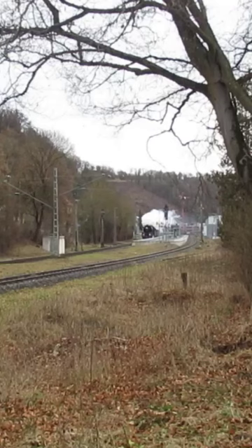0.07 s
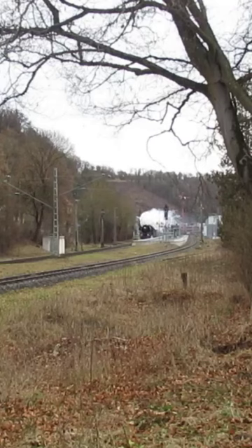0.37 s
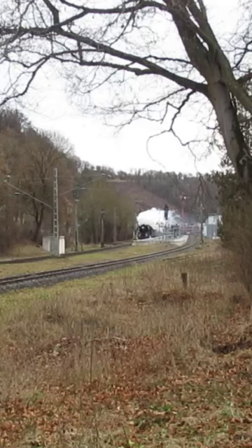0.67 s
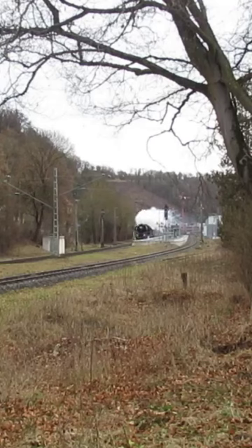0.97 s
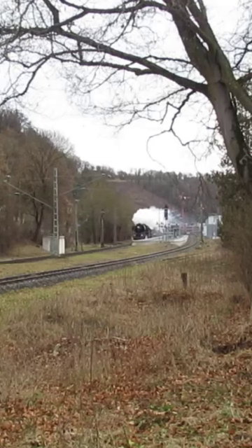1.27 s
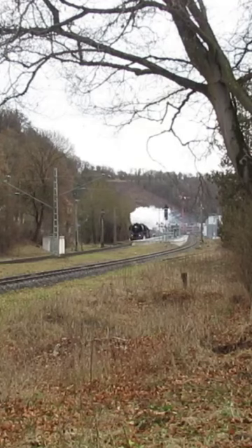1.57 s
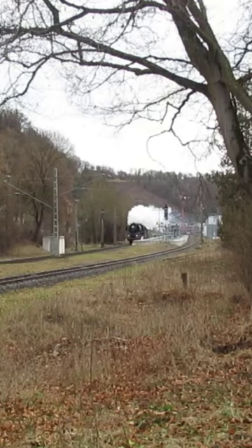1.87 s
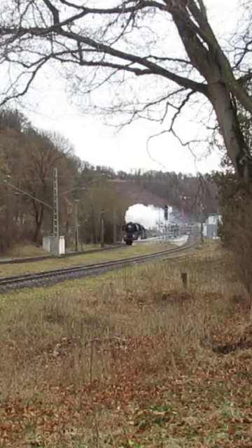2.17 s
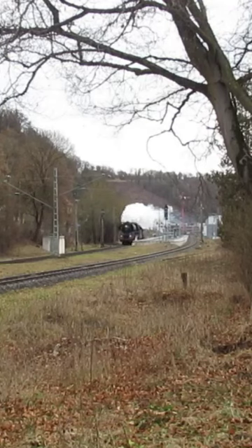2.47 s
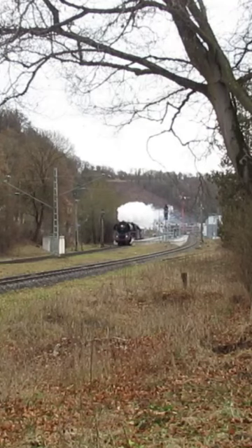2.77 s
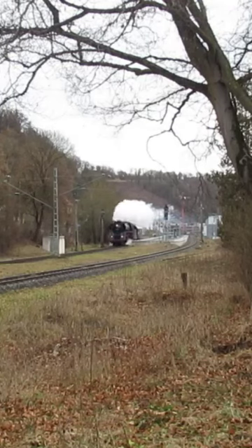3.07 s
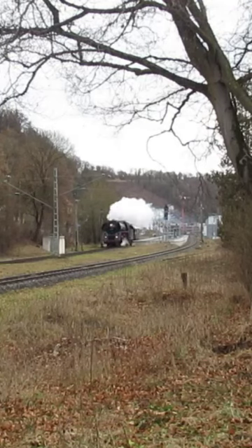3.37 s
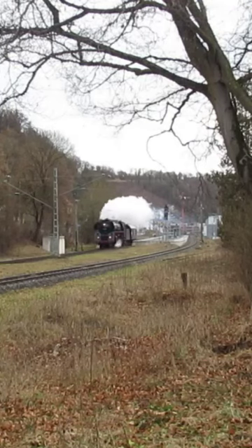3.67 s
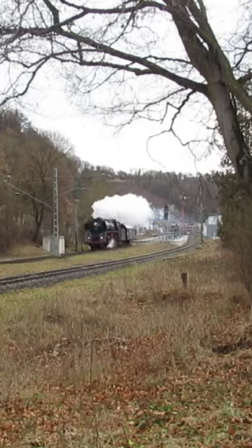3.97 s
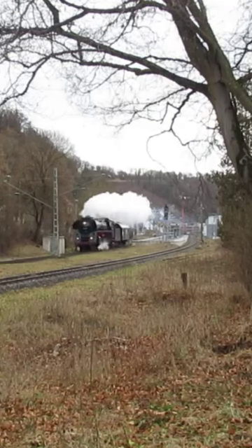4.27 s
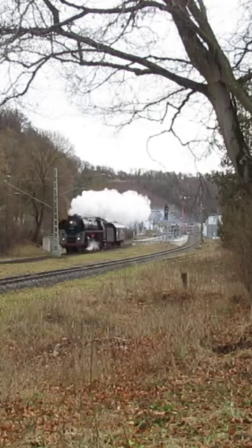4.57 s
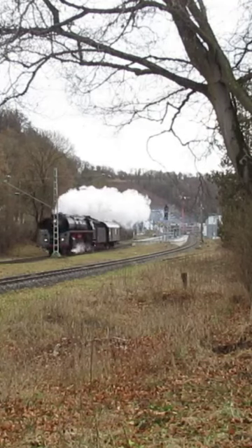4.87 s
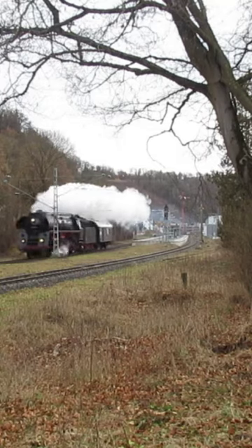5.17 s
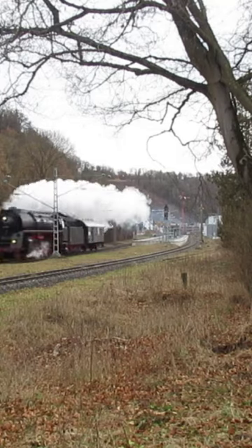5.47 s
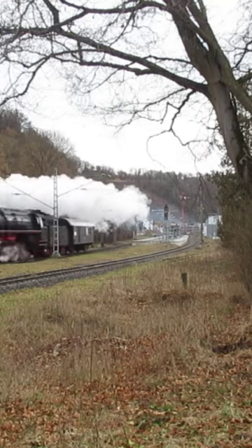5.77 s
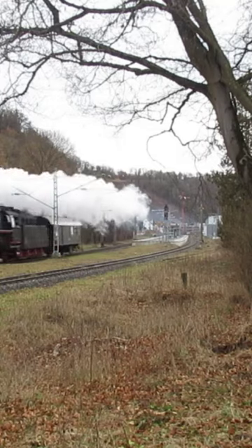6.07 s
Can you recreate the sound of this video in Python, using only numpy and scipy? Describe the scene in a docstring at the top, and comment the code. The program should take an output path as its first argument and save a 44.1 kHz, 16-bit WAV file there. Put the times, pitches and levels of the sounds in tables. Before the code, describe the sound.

A steam locomotive approaches fast, its rumble and wheel roar growing, while a nearby camera shutter clicks in rapid bursts.

```python
"""A steam locomotive runs fast towards a listener in a field beside the line. From the start its
exhaust beats blur into a throbbing rumble under the roar and ring of wheels and the hiss of steam.
Close by, a lens ticks faintly as it focuses; from 2.3 s a camera fires runs of shutter clicks that
gradually slow. From 3 s the wheels clank over rail joints, and the roar grows as the engine nears."""
import sys
import numpy as np
from scipy import signal
from scipy.fft import rfft, irfft, next_fast_len
from scipy.io import wavfile

SR = 44100
rng = np.random.default_rng(int(sys.argv[2]) if len(sys.argv) > 2 else 0)


def wrap_up_sound(samples):
    """Save the sound to the file named by the first command line argument, as 16-bit audio."""
    columns = np.atleast_2d(samples).T
    # keep every value between -1 and 1, then stretch to whole-number steps
    tamed = np.clip(columns, -1, 1)
    steps = np.round(tamed * 32767).astype(np.int16)
    wavfile.write(sys.argv[1], SR, steps)


N = 278271


def from_db(db):
    """Amplitude ratio: tenfold for every 20 dB."""
    return 10 ** (np.asarray(db) / 20)


def rms_one(x):
    """Normalisation to an rms of 1."""
    return x / np.sqrt(np.mean(x ** 2) + 1e-20)


def in_time(rows):
    """Linear interpolation of each column over the times in the first."""
    s, *columns = np.transpose(rows)
    return [np.interp(np.arange(N) / SR, s, c) for c in columns]


def swells(rows, length_s):
    """A Gaussian rise and fall of level for each row, in dB."""
    t = np.arange(N) / SR
    return sum(db * np.exp(-(2 * (t - s) / length_s) ** 2) for s, db in rows)


def drift(rate_hz):
    """Random fluctuation: noise low-passed at rate_hz, with an rms of 1."""
    step, settle = 40, 2000
    pole = np.exp(-2 * np.pi * step * rate_hz / SR)
    white = rng.standard_normal(N // step + settle + 2)
    slow = signal.lfilter([1], [1, -2 * pole, pole * pole], white)[settle:]
    return np.interp(np.arange(N) / step, np.arange(len(slow)), rms_one(slow))


def noise(spectrum):
    """Spectral shaping of white noise, falling steeply beyond the ends of the spectrum; rms 1."""
    hz, db = np.transpose(spectrum)
    size = next_fast_len(N)
    f = np.maximum(np.fft.rfftfreq(size, 1 / SR), 1)
    skirts = np.minimum(1, np.minimum(f / hz[0], hz[-1] / f)) ** 2
    gain = from_db(np.interp(np.log(f), np.log(hz), db)) * skirts
    return rms_one(irfft(rfft(rng.standard_normal(size)) * gain, size)[:N])


def resonate(x, modes, order=1):
    """Superposition of resonances of alternating sign; a higher order has steeper skirts."""
    out = 0
    for k, (hz, width, db) in enumerate(modes):
        edges = np.clip([hz - width / 2, hz + width / 2], 10, SR / 2 - 10)
        band = signal.butter(order, edges, "band", fs=SR, output="sos")
        out = out + (-1) ** k * from_db(db) * signal.sosfilt(band, x + 1e-18)
    return out


def resonant_noise(modes):
    """Random excitation: independent noise drives each resonance; rms 1."""
    return rms_one(sum(resonate(rng.standard_normal(N), [mode], order=2) for mode in modes))


def snaps(rows, delay_s):
    """Impulsive excitation: one hard contact for each row of time and level."""
    clicks = np.zeros(N)
    for s, db in rows:
        clicks[int(np.clip(round((s + delay_s) * SR), 0, N - 1))] += from_db(db)
    return clicks


def chatter(rows, delay_s, t60):
    """Exponential decay: each contact starts a noise burst that falls 60 dB in t60 seconds."""
    fading = signal.lfilter([1], [1, -from_db(-60 / (t60 * SR))], snaps(rows, delay_s) + 1e-18)
    return fading * rng.choice([-1, 1], N)


def heard_db(reference_db, loss_db, reference_m=100):
    """Spherical spreading from the nearing engine; air and ground absorb loss_db per reference_m."""
    start_m, speed_m_per_s, aside_m = 187.9, 27.16, 30.6
    metres = np.hypot(aside_m, start_m - speed_m_per_s * np.arange(N) / SR)
    distance = metres / reference_m
    return reference_db - 20 * np.log10(distance) - loss_db * (distance - 1)


def beats(depth, beats_per_s=17.55, first_s=0.006):
    """Amplitude modulation by the exhaust: four blasts to a turn of the driving wheels."""
    # Each entry: strength of one blast in dB.
    beat_db = [4.5, -3.5, -5, 5]
    cycle = (np.arange(N) / SR - first_s) * beats_per_s
    strength = from_db(beat_db)[np.round(cycle).astype(int) % len(beat_db)]
    blast = strength * np.cos(np.pi * cycle) ** 2
    return rms_one(1 - depth + depth * blast)


def exhaust(swell_db):
    """Turbulent blasts excite resonances: the bass throbs, while the beats blur in the chimney's roar."""
    # Exhaust resonances. Each row: frequency in Hz, bandwidth in Hz, level in dB.
    rumble_modes = [(36.8, 9.4, -2), (56.4, 24, 0), (77, 22, -1), (98.7, 20, -7.5), (187.1, 27, 0)]
    chimney_modes = [(312.6, 45.5, -11), (389.2, 67, -2), (453.5, 59, -6), (586.4, 146, -5),
                     (778, 205, -3.5), (796, 58, -7)]
    # Brief surges of the chimney. Each row: centre in seconds, rise in dB.
    surges = [(0.7, 1.5), (1.1, 1.2), (1.6, 1.8), (2.05, 1.6), (2.33, 2.4), (3.02, 1.7), (3.65, 1.6)]
    rumble_db = heard_db(-39.0, loss_db=-0.2) + 0.42 * drift(rate_hz=3)
    rumble = from_db(rumble_db) * resonant_noise(rumble_modes) * beats(depth=0.42)
    roar_db = heard_db(-29.5, loss_db=0.4) + swell_db + swells(surges, length_s=0.15)
    return rumble + from_db(roar_db) * resonant_noise(chimney_modes) * beats(depth=0.018)


def running_gear(swell_db):
    """Rolling noise of wheels on rails wavers in the moving air; a low drone joins at close range."""
    # Rolling spectrum. Each row: frequency in Hz, spectral density in dB.
    rolling = [(120, -10.5), (300, -7), (600, -6), (950, 0), (1180, 0), (1420, -3), (1700, -4),
               (2050, -6.5), (2500, -9), (3200, -16.5), (4200, -23.5), (7000, -52)]
    # Growth of the drone. Each row: time in seconds, level in dB.
    drone = [(0, -53.5), (3.9, -48), (4.4, -53), (5.0, -42.5), (5.7, -37), (6.0, -30), (6.31, -26.5)]
    rolling_db = heard_db(-30.0, loss_db=0.3) + swell_db + 0.35 * drift(rate_hz=4.1)
    drone_db, = in_time(drone)
    return from_db(rolling_db) * noise(rolling) + from_db(drone_db) * resonant_noise([(119, 43, 0)])


def wheel_ring():
    """Modal vibration: steel wheels ring unsteadily, in other modes on the curve than on the straight."""
    # Each row: time in seconds, level of the curve modes in dB, level of the straight modes in dB.
    levels = [(0, -48.5, -65), (1.3, -43, -78), (2.5, -44.5, -55), (3.4, -37.5, -41), (3.9, -37, -32.5),
              (4.5, -36.5, -32.5), (5.1, -38, -34), (5.7, -46, -29.5), (6.31, -54, -30)]
    # Wheel resonances. Each row: frequency in Hz, bandwidth in Hz, level in dB.
    curve_modes = [(1677, 284, -7.5), (3010, 77, -15)]
    straight_modes = [(1277, 230, 2), (1665, 60, -6), (2362, 99, -5), (2850, 320, -30)]
    curve_db, straight_db = in_time(levels)
    curve = from_db(curve_db) * resonant_noise(curve_modes)
    straight = from_db(straight_db) * resonant_noise(straight_modes)
    return (curve + straight) * from_db(0.81 * drift(rate_hz=12.0))


def steam(swell_db):
    """Jet noise from the cylinders; absorption lets its treble carry only a short way."""
    # Steam spectra. Each row: frequency in Hz, spectral density in dB.
    hiss = [(1500, 1.5), (3000, 4), (3800, 0.5), (5000, -5), (6500, -10), (9000, -27.5), (15000, -29)]
    near_hiss = [(3500, -31), (5500, -2), (7200, 0.5), (9000, -6), (10200, -7), (11500, -14), (15000, -23)]
    # Sharper puffs of steam. Each row: centre in seconds, rise in dB.
    puffs = [(5.2, 2.5), (5.61, 3.5), (6.08, 2), (6.19, 2.4)]
    body = from_db(heard_db(-43.0, loss_db=8)) * noise(hiss)
    top = from_db(heard_db(-59.0, loss_db=20.0) + swells(puffs, length_s=0.078)) * noise(near_hiss)
    return (body + top) * from_db(0.59 * swell_db + 1.06 * drift(rate_hz=52)) * beats(depth=0.038)


def microphone_hiss():
    """Self-noise of the microphone: a faint, steady hiss."""
    # Each row: frequency in Hz, spectral density in dB.
    spectrum = [(3000, 5), (9000, -2), (12000, -7), (14000, -4), (15500, -4)]
    return from_db(-61.0) * noise(spectrum)


def lens_focus():
    """Small impacts excite the resonances of the lens as it focuses."""
    # Each row: start in seconds, level in dB.
    ticks = [(0.218, -50.5), (0.232, -59), (1.109, -51), (1.265, -50), (2.280, -53), (2.304, -53)]
    # Each row: frequency in Hz, bandwidth in Hz, level in dB.
    lens_modes = [(5400, 700, -2), (6540, 700, -0.5), (8200, 430, 2.5), (13500, 3000, -15)]
    return resonate(from_db(13) * chatter(ticks, 0, t60=0.042), lens_modes)


def wisps():
    """Noise bands under Gaussian envelopes: a soft rustle, a thin squeak and faint high singing."""
    # Each row: centre in seconds, length in seconds, frequency in Hz, bandwidth in Hz, level in dB.
    bands = [(0.72, 0.32, 7700, 3800, -63), (1.47, .2, 7700, 600, -70), (1.66, 0.2, 6300, 130, -71),
             (4.4, 1.6, 9950, 600, -64), (3.7, 3.0, 13880, 200, -77)]
    t = np.arange(N) / SR
    return sum(from_db(db) * np.exp(-(2 * (t - s) / length) ** 2) * resonant_noise([(hz, width, 0)])
               for s, length, hz, width, db in bands)


def shutter(level_db=-28, latch_lead_s=.0026, return_s=.0609):
    """Impacts ring the camera: a latch ticks, the shutter snaps and chatters; both repeat on closing."""
    # Runs of exposures, slower as the camera's memory fills.
    # Each row: start in seconds, interval in seconds, number of exposures.
    bursts = [(2.3453, .1326, 6), (3.1441, .1628, 2), (3.4756, .16955, 10), (5.1836, .2481, 2),
              (5.6123, .2533, 2), (6.1389, 0, 1)]
    # Each row: frequency in Hz, bandwidth in Hz, level in dB.
    camera_modes = [(5240, 200, -3.5), (6130, 370, -5), (6600, 370, -2.5), (7350, 470, -3), (8190, 400, -3),
                    (10300, 620, -3.5), (12700, 520, -9.5), (14000, 400, -11), (14750, 500, -14.5)]
    shots = [(first + k * gap, level_db) for first, gap, count in bursts for k in range(count)]
    opening = from_db(24.5) * snaps(shots, .0008) + from_db(5.0) * chatter(shots, .00079, t60=0.013)
    closing = from_db(20.5) * snaps(shots, return_s) + from_db(6.5) * chatter(shots, return_s, t60=0.013)
    latch = from_db(-1.5) * sum(chatter(shots, s - latch_lead_s, t60=0.016) for s in (0, return_s))
    return resonate(opening + closing + latch, camera_modes)


def rail_joints(axle_gap_s=.0275, axle_loss_db=1.5):
    """Impact noise: one axle after another strikes a joint and excites the modes of the rail."""
    # Each row: start in seconds, level of the first blow in dB, number of axles.
    clanks = [(3.0086, -25, 2), (3.5884, -25, 3), (3.8174, -21, 1), (3.9136, -20, 3), (4.041, -22.5, 2),
              (4.7234, -22, 1), (4.8248, -20, 2), (5.4321, -24, 1), (5.746, -20, 1), (5.8624, -19, 1),
              (5.972, -15, 1), (6.1982, -9.5, 1)]
    # Each row: frequency in Hz, bandwidth in Hz, level in dB.
    rail_modes = [(1630, 580, 1.5), (2280, 430, 2), (2960, 600, 2), (3640, 870, -14.5), (4500, 700, -5.5),
                  (5900, 1200, -17.5)]
    hits = [(s + k * axle_gap_s, db - k * axle_loss_db)
            for s, db, axles in clanks for k in range(round(axles))]
    blows = from_db(2.5) * chatter(hits, 0, t60=0.058) + from_db(18.0) * snaps(hits, 0.000905)
    return resonate(blows, rail_modes, order=2)


def scene():
    """Superposition of the train, the camera and the faint high sounds in one channel."""
    # The sound swells in the bend, eases, and swells again as the engine shows its flank.
    # Each row: time in seconds, chimney gain in dB, rolling gain in dB (the steam follows it in part).
    swell = [(0.3, -1.5, -0.9), (1.8, -0.7, 0), (2.55, -2, 0.9), (3.3, -1.6, -0.2), (3.65, 0.5, -0.5),
             (3.95, -0.7, 0.2), (4.25, 0, 0.8), (5.05, -1.7, -0.6), (5.45, -0.9, -1.9), (5.65, -1.4, 0.4),
             (6.0, 0.8, -0.5), (6.2, 2.5, 1.8), (6.31, 0, 3)]
    chimney_db, wheels_db = in_time(swell)
    train = exhaust(chimney_db) + running_gear(wheels_db) + wheel_ring() + steam(wheels_db)
    return (train + microphone_hiss() + lens_focus() + wisps() + shutter() + rail_joints())[None]


def record(dry, cutoff_hz=15100):
    """Gating and band limiting: the sound enters after a moment, and a steep low-pass cuts the top."""
    gate = np.interp(np.arange(N) / SR, [.085, .1], [0, 1])
    return signal.sosfilt(signal.ellip(12, .1, 80, cutoff_hz, fs=SR, output="sos"), dry * gate)


dry = scene()
out = record(dry)
wrap_up_sound(out)
```